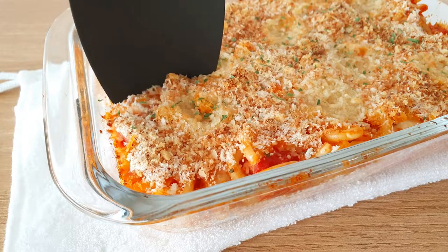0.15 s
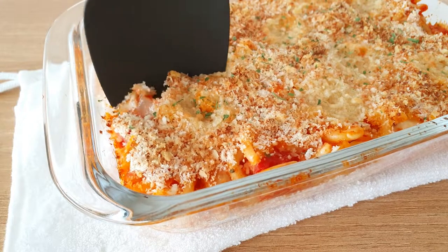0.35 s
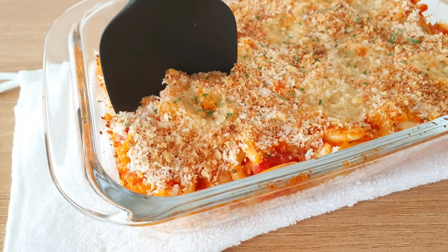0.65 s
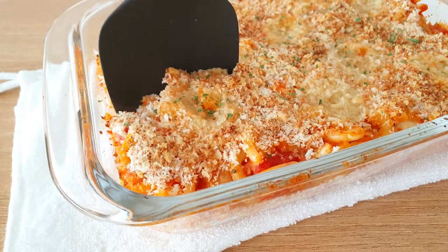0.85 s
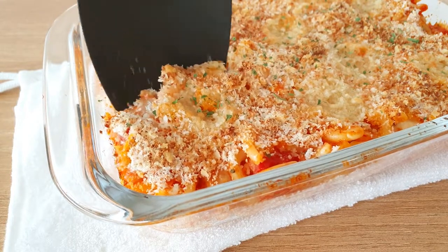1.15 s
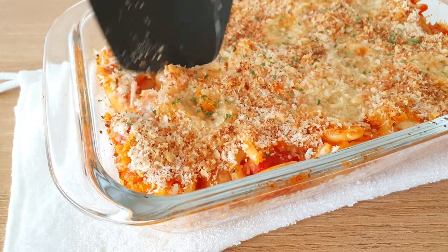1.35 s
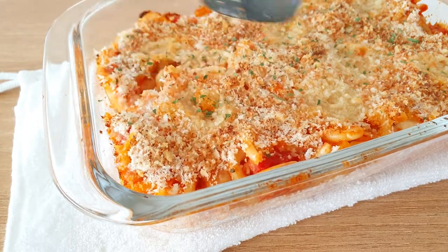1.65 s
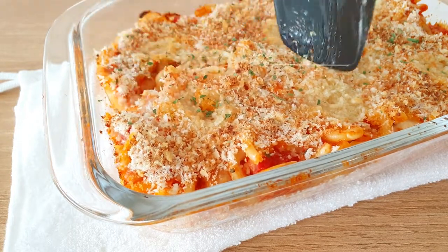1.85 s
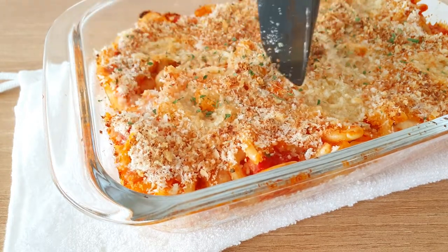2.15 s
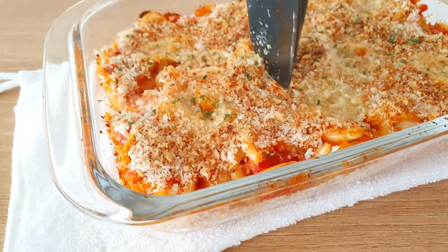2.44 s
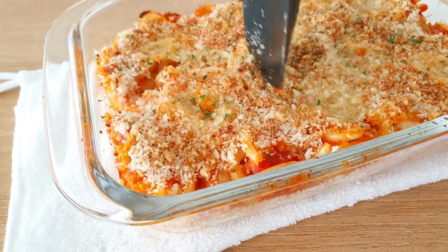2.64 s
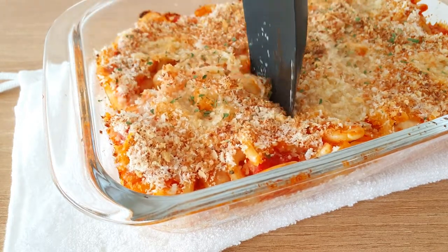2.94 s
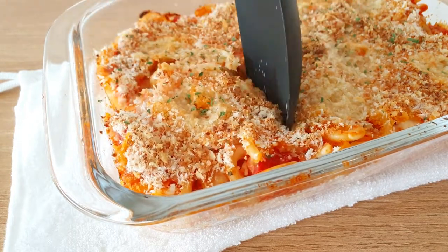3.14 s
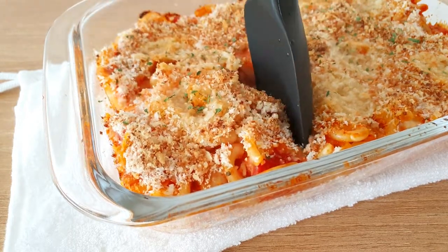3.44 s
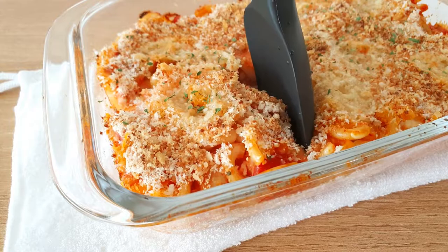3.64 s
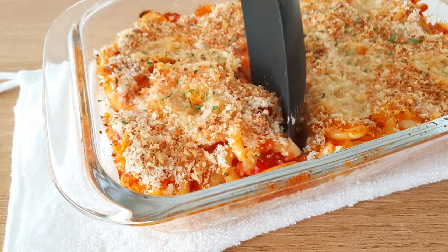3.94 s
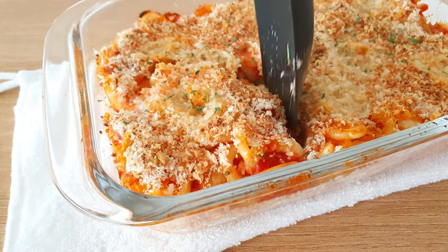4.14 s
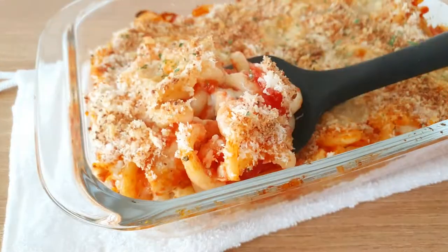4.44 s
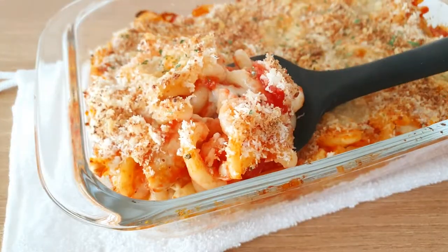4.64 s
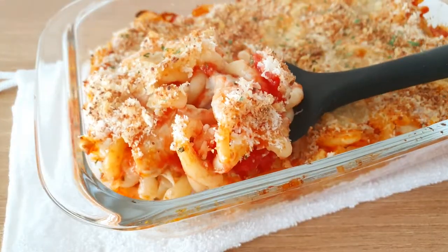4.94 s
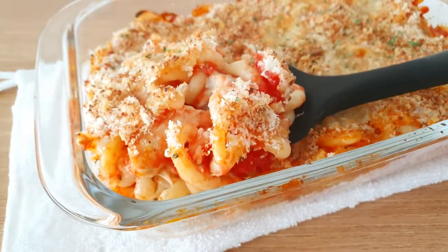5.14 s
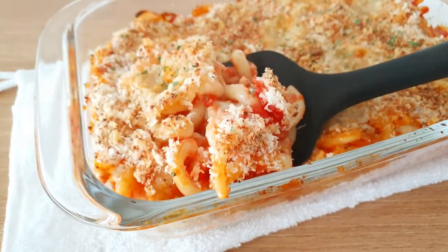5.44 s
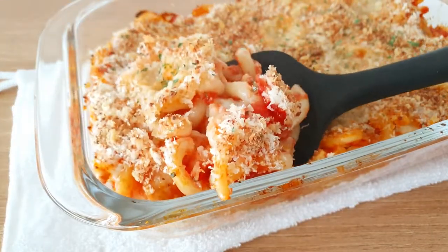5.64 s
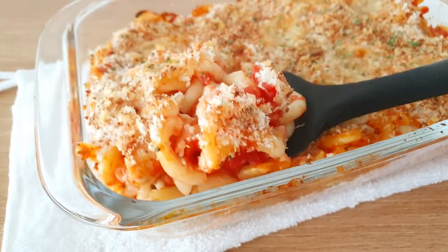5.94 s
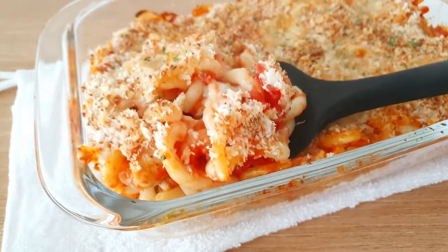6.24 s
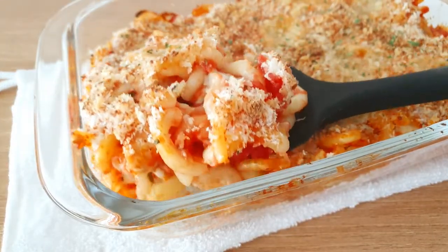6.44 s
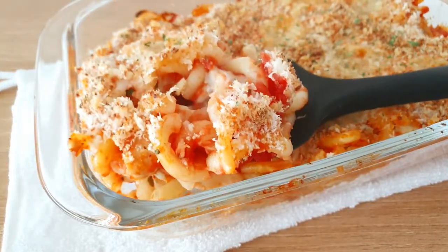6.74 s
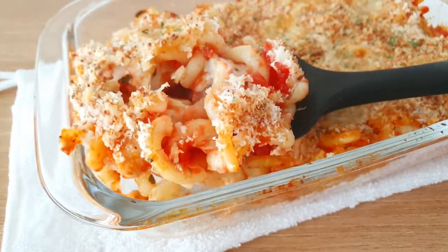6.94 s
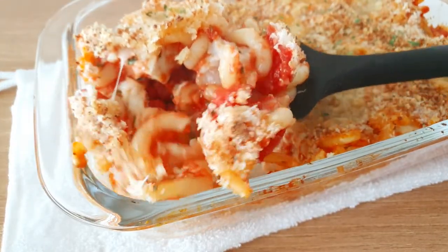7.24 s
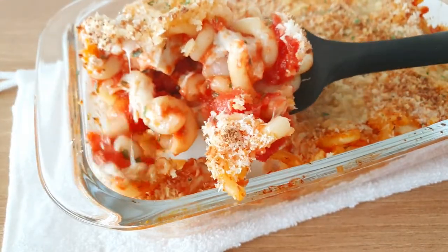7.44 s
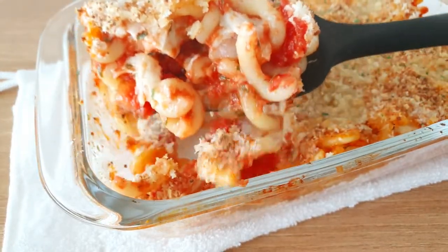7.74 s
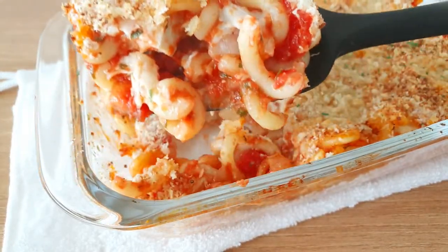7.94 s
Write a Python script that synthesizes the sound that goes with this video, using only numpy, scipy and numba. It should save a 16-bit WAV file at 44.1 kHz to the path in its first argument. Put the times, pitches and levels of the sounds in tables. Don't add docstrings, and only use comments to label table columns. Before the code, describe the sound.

Crisp crumbs break in dense clusters while larger flakes crack singly. The first cut fades into light ticking, the second is the strongest, with the blade juddering on glass and soft low thumps through the table. A momentary silence with one tick leads to lighter crackling, a sudden sticky tear, and a loosening scoop. Close microphone, dry quiet kitchen, low steady room hum.

```python
import sys
import numpy as np
from scipy import signal
from scipy.fft import rfft, irfft
from scipy.io import wavfile
from scipy.ndimage import uniform_filter1d
from numba import njit

SR = 44100
rng = np.random.default_rng(int(sys.argv[2]) if len(sys.argv) > 2 else 0)


def volts_from_db(level):
    exponent = np.asarray(level, float) / 20
    return 10 ** exponent


def unload_wav(signal):
    wavfile.write(
        sys.argv[1],
        SR,
        np.round(np.clip(np.atleast_2d(signal).T, -1, 1) * 32767).astype(np.int16),
    )


N = 356328

CUT_END_S, TICK_S, LIFT_START_S = 4.1675, 4.2392, 4.2603
RESTING_DB = -53
BAND_EDGES_HZ, FLAKE_HZ = (300, 850, 1650, 2700, 7200), 4500

# start [t/s], rise [t/s], hold [t/s], fall [t/s], crumbs at full pressure [level/dB]
STROKES = [(-0.3, 0.54, .3, .2, -41), (0.01, 0.36, 0.13, 0.22, -36.5), (1.089, 0.063, 0.081, 0.037, -47),
           (1.903, .7, .45, .1, -48.5), (2.76, 0.17, 0.069, .1, -41), (3.6, .05, 0.15, .1, -42.5),
           (2.897, 0.28, 0.14, 0.33, -32), (3.318, 0.12, 0.076, 0.32, -34.5),
           (3.835, 0.081, 0.1, 0.14, -36), (3.898, 0.11, .15, .1, -45), (4.206, 0.11, 0.99, 0.097, -43.5),
           (5.304, 0.069, 0.084, .2, -35.5), (5.306, 0.12, 0.97, 0.93, -37.5),
           (6.587, 0.34, 0.19, 0.23, -43), (7.237, 0.099, 0.11, 0.4, -46.5),
           (7.548, 0.034, 0.15, 0.76, -43)]
# [f/Hz], [level/dB per Hz]
CUTTING_COLOUR = [(190, -12), (330, -10.5), (441, -11), (501, -5.5), (552, -9.5), (637, -6), (1020, -9.5),
                  (2500, -5), (3480, 3), (4450, -8), (5600, -2), (6300, -5.5), (7200, -19.5), (9300, -14.5),
                  (15300, -32.5)]
# [f/Hz], [level/dB per Hz]
LIFTING_COLOUR = [(180, -53), (300, -44.5), (599, -23), (1260, -15), (1580, -19), (1890, -7), (2950, -0.5),
                  (3780, 4.5), (4450, -7.5), (6090, 0.5), (7540, -19), (9500, -13.5), (14600, -27.5),
                  (15300, -25.5)]
# [f/Hz], [level/dB per Hz]
RESTING_COLOUR = [(410, -20), (700, -12), (872, -16), (954, -11.5), (1820, -7), (2860, -5), (3470, 10.5),
                  (4320, -7), (5810, 4.5), (6870, -11), (8230, -3.5), (15300, -17.5)]
# [t/s], [level/dB]
SAUCE = [
    (4.26, -59),
    (5.38, -69),
    (5.48, -46),
    (6.44, -51.5),
    (6.7, -61),
    (7.0, -52),
    (7.36, -53),
    (7.5, -62.5),
    (7.62, -50),
    (8.08, -58),
]
# start [t/s], length [t/s], coarse flakes [level/dB]
SLIDES = [
    (.78, 0.15, -55),
    (1.09, 0.16, -39.5),
    (3.68, 0.081, -58),
]
# start [t/s], length [t/s], [level/dB]
FIZZES = [
    (-.05, 0.59, -49),
    (5.6, 0.15, -53),
    (1.11, 0.1, -63),
    (3.19, .07, -32.5),
    (3.62, 0.11, -46),
    (6.95, 0.15, -51),
    (7.32, 0.057, -43),
]
# [level/dB, twice the usual]
SHIFTS = [
    (7.56, .47, -88),
    (3.7, 0.14, -104),
]
# start [t/s], length [t/s], [level/dB]
LOW_SWELLS = [
    (7.26, 1.1, -60),
    (3.68, 0.078, -69),
    (3.6, 0.074, -58),
    (2.8, 0.084, -58),
    (2.42, 0.34, -65),
    (0.52, 0.46, -66),
]

# [t/s], peak [level/dB], ring [f/Hz], bright part [level/dB]
FIRST_CUT_CRACKS = [(0.0262, -25.5, 6030, -1.5), (0.0786, -23, 5300, -4), (0.1156, -21, 3510, -6),
                    (0.1554, -18, 3400, -9), (0.1651, -29, 2560, 9), (0.2065, -12.5, 3550, -18),
                    (0.2356, -15, 5850, -14), (0.2614, -15, 5540, -12), (0.2694, -19, 5740, -17),
                    (0.2981, -18, 5400, -4), (0.3195, -23, 3050, -19), (0.3326, -10, 5850, -11),
                    (0.3522, -10, 5700, -19), (0.3774, -13.5, 6200, 0.5), (0.3853, -16, 3600, -23),
                    (0.4396, -11, 3420, -17), (0.4447, -15, 3630, -16), (0.4551, -14, 3530, -20),
                    (0.4805, -9, 3550, -17), (0.4833, -7, 3500, -15), (0.4849, -14, 3400, -20),
                    (0.4881, -19, 3320, -18), (0.5012, -7, 3400, -26), (0.5258, -14, 3270, -28),
                    (0.5481, -19, 3170, -16.5), (0.5517, -10, 3570, -31), (0.5691, -14, 1870, -15),
                    (0.5754, -8, 3460, -31), (0.6128, -8.5, 3800, -22), (0.6182, -20, 3187, -30),
                    (0.6463, -20.5, 11000, -11), (0.6506, -33, 3380, -23), (0.662, -6, 3317, -37),
                    (0.7041, -29, 2370, -3), (0.713, -23, 3430, -15), (0.7248, -24, 3360, -26),
                    (0.7723, -17.5, 3400, -25), (0.7812, -26, 5860, -26), (0.8127, -20, 3180, -29),
                    (0.9586, -39, 6700, 10), (0.9757, -31, 3600, -6), (1.041, -22, 3140, -29),
                    (1.1543, -19.5, 6240, -6), (1.2073, -10.5, 3500, -5), (1.2471, -18, 3530, -4)]
# [t/s], peak [level/dB], ring [f/Hz], bright
# part [level/dB]
RESTING_TO_CUT_CRACKS = [(1.5152, -23, 5800, -13), (1.6392, -29.5, 3290, -1), (1.7839, -23, 3830, -10),
                         (1.8518, -27.5, 3650, -2), (1.919, -25, 3450, -2), (2.1009, -31, 6000, 3.5),
                         (2.138, -25, 5500, -9), (2.2535, -31.5, 7180, 6.5), (2.43, -33, 6030, 0),
                         (2.5328, -20.5, 3700, -8), (2.556, -21.5, 8040, -20), (2.679, -19, 5650, -17),
                         (2.7462, -29, 3490, -20), (2.7702, -14.5, 9500, -8), (2.7745, -28, 5900, 3),
                         (2.7782, -21, 8850, -7), (2.845, -21, 3490, -15), (2.8534, -15.5, 6460, -8),
                         (2.9258, -14.5, 8200, -4), (2.9485, -19, 5730, -1), (2.9597, -26, 1700, -15),
                         (2.9798, -16.5, 3530, -10), (2.9964, -17, 5700, -5), (3.0163, -20, 3380, -18),
                         (3.0356, -18.5, 3490, -22.5), (3.0558, -25, 6100, 1), (3.064, -28, 3290, -18),
                         (3.0886, -21, 2980, -14)]
# [t/s], peak [level/dB], ring [f/Hz], bright part [level/dB]
SECOND_CUT_CRACKS = [(3.0955, -8, 5570, -5), (3.128, -12, 5190, -32), (3.142, -8.5, 3010, -21),
                     (3.1847, -4.5, 1700, -26), (3.1962, -11, 3810, -7), (3.208, -12.5, 6030, -1),
                     (3.223, -14, 5280, -19), (3.227, -15, 5800, -5), (3.2412, -10, 5120, -18),
                     (3.2573, -8, 5830, -10), (3.2659, -9, 4950, -15), (3.2914, -15, 5380, -17),
                     (3.308, -13, 3450, -15), (3.3338, -3.5, 3720, -17), (3.3439, -3.5, 3300, -25),
                     (3.3688, -6, 3230, -26), (3.395, 1, 4830, -26), (3.4004, -4, 3420, -31),
                     (3.408, -10, 5750, -24), (3.4123, -3, 3430, -20), (3.4335, -3.5, 3430, -22.5),
                     (3.4707, -7.5, 3190, -22), (3.5128, -3, 3540, -13), (3.5211, -9.5, 2140, -19),
                     (3.5394, -13.5, 2110, -31), (3.547, -13, 3430, -28), (3.5848, -12.5, 3500, -18),
                     (3.591, -22, 2350, -15), (3.5956, -3, 3400, -29), (3.625, -23, 2610, -2),
                     (3.6406, -10.5, 6860, -10.5), (3.673, -8, 5720, -18), (3.702, -17, 2690, -4.5),
                     (3.765, -18, 3430, -8.5), (3.882, -12, 6000, -10.5), (3.8989, -20, 2240, -23.5),
                     (3.9117, -15, 2500, -18), (3.916, -7.5, 4130, -22), (3.9379, -20, 5920, 0),
                     (3.9471, -9, 3640, -8), (3.9564, -13.5, 1810, -9.5), (3.966, -19.5, 4870, 4),
                     (4.0039, -9.5, 6100, -11), (4.0068, -13, 3710, -4), (4.0346, -23, 4240, 7),
                     (4.0518, -14, 2290, -10), (4.133, -19, 5840, -3.5), (4.1567, -30, 6370, 6.5)]
# [t/s], peak [level/dB], ring [f/Hz], bright part [level/dB]
WEDGING_CRACKS = [(4.274, -13, 6120, -7), (4.3148, -20.5, 5940, -6), (4.3203, -20, 6140, -14),
                  (4.338, -27, 3510, -13), (4.3409, -15.5, 6310, -10), (4.3448, -20.5, 3060, -12),
                  (4.4008, -13, 3600, -25), (4.437, -25, 6330, 2), (4.4828, -21.5, 6240, -1),
                  (4.524, -18.5, 2440, -17), (4.533, -20.5, 3600, 1.5), (4.5661, -8.5, 5520, -12),
                  (4.5762, -16, 3600, -14), (4.6053, -22, 3680, 1), (4.6397, -19, 6240, -3),
                  (4.688, -17.5, 6180, -3), (4.8089, -22, 3550, -5), (4.8374, -13, 6010, -7),
                  (4.8862, -15, 6000, -6), (4.9508, -31.5, 5500, 10.5), (5.0349, -9, 5700, -20),
                  (5.078, -13.5, 5900, -11), (5.113, -18.5, 6300, -4), (5.1836, -23, 5760, -13),
                  (5.1904, -16.5, 5270, -19), (5.244, -19, 5880, -13), (5.2733, -13.5, 5520, -10),
                  (5.3255, -13, 5620, -19), (5.3514, -18, 5560, -15), (5.3558, -13, 5530, -20),
                  (5.358, -17, 5570, -14), (5.378, -11, 5150, -6), (5.3877, -14.5, 5840, -12)]
# [t/s], peak [level/dB], ring [f/Hz], bright part [level/dB]
TEARING_CRACKS = [(5.4207, -15.5, 2580, -14), (5.4346, -21, 6010, -2), (5.443, -12, 5700, -7),
                  (5.4458, -15, 3770, 2), (5.4494, -6.5, 6330, -3.5), (5.452, -2.5, 3800, -14),
                  (5.4703, -5.5, 3440, -14), (5.494, -13, 3600, -6), (5.498, -12.5, 6290, -3),
                  (5.518, -19, 2600, -9), (5.5758, -11, 3770, -23), (5.5912, -10, 6090, -18),
                  (5.613, -16, 6340, -1), (5.6428, -16, 5510, -14), (5.6593, -8.5, 6310, -4),
                  (5.6925, -13, 6440, -3), (5.7086, -11, 3100, -16), (5.7456, -10, 3730, -30),
                  (5.8116, -22, 6180, -23), (5.8344, -1.5, 6510, -19), (5.857, -13.5, 6630, -20),
                  (5.87, -18, 6370, 1), (5.912, -22.5, 3370, 5), (5.9244, -5, 3500, -17),
                  (5.928, -15, 3570, -16), (6.0041, -17, 3730, -9), (6.0083, -19, 6200, -8),
                  (6.027, -10, 3800, -19), (6.0354, -7.5, 5300, -23), (6.048, -13.5, 3730, -11),
                  (6.091, -10, 6170, -5), (6.1377, -20, 3200, -16), (6.1555, -6, 3700, -5),
                  (6.162, -19, 5970, -6), (6.188, -12, 6560, -6), (6.206, -24, 6240, 4),
                  (6.249, -22, 3790, 0), (6.2901, -14, 3620, -2), (6.2998, -6.5, 5530, -23),
                  (6.327, -17.5, 6220, -2), (6.3449, -3, 3670, -11)]
# [t/s], peak [level/dB], ring [f/Hz], bright part [level/dB]
LIFTING_CRACKS = [(6.359, -22, 3340, -1), (6.373, -27.5, 3510, 7), (6.4224, -26, 6180, 5),
                  (6.4372, -23.5, 3680, -16), (6.4736, -16.5, 3580, -13), (6.514, -20, 5300, 3),
                  (6.5533, -18.5, 5320, -9), (6.5732, -23, 3800, 6), (6.5756, -23, 6020, -17),
                  (6.6335, -20, 3350, -16), (6.6711, -13, 5700, -10), (6.735, -18, 5780, -5),
                  (6.74, -20, 5800, -9), (6.7481, -26, 3230, 2), (6.8116, -21.5, 3770, -11),
                  (6.8695, -20, 3510, -3), (6.874, -21, 5570, -10), (6.8885, -21, 5920, -13),
                  (6.9034, -20, 5730, -10), (6.9098, -13, 3320, -20), (6.9645, -5.5, 5750, -24),
                  (7.1088, -27, 6380, -13), (7.129, -12, 3780, -31), (7.3554, -28, 5900, -1),
                  (7.4647, -16.5, 5300, -13), (7.644, -16, 6100, -9), (7.6809, -17, 2850, -25),
                  (7.71, -15.5, 2800, -26), (7.749, -19, 3040, -10), (7.7568, -17, 3300, 3),
                  (7.8029, -10.5, 3240, -11), (7.8642, -16, 3330, -7), (7.897, -18, 2980, -25),
                  (7.992, -22, 6000, 2), (8.0405, -20, 5700, -13)]

# [t/s], peak [level/dB], ring [f/Hz]
POPS = [(0.502, -9, 2380), (2.979, -23, 1620), (3.143, -16.5, 1600), (3.1875, -5.5, 1570),
        (3.399, -22, 1650), (3.5105, -16, 1710), (3.5942, -12, 2030), (3.898, -21.5, 1830),
        (3.957, -10, 1740), (4.371, -33, 1410), (4.5217, -26, 1800), (4.6035, -26, 1230),
        (4.874, -34, 1280), (5.4503, -24.5, 1040), (5.5462, -20.5, 1380), (5.7447, -19.5, 1350),
        (5.8796, -21.5, 1270), (5.923, -25, 1220), (6.0516, -20, 1230), (6.4147, -30, 1250),
        (6.5346, -33, 1260), (6.9633, -28, 1230), (7.1292, -26, 1430)]
# [f/Hz], width [f/Hz], [level/dB]
DISH_MODES = [(227, 23, -7.5), (355, 17, 1), (506, 14, 7.5), (580, 7.6, 4), (630, 20, 4), (677, 16, -4)]
# [t/s], peak [level/dB], width [t/s]
THUMPS = [(0.55, -45.5, 0.051), (1.24, -52, 0.035), (2.5, -62, .04), (2.86, -59, 0.056), (3.75, -62, 0.15),
          (3.31, -58, 0.084), (3.49, -55, 0.11), (4.01, -47, 0.06), (6.9, -60, 0.094), (7.46, -60, 0.044),
          (8.08, -56, 0.066)]
# [f/Hz], [level/dB per Hz]
ROOM_COLOUR = [(15, -57), (25, -18), (40, 4.5), (60, 0), (297, 1), (557, -2), (900, -48), (1170, -60),
               (1980, -120)]
# [f/Hz], side minus mid [level/dB]
SPREAD = [(60, -29), (110, -35.5), (200, -27), (380, -15.5), (700, -16), (1290, -40), (2380, -29),
          (4400, -35), (8120, -19), (15000, -1.5)]


def unit(x):
    return x / np.sqrt(np.mean(x ** 2))


def colour(x, points):
    hz, db = np.transpose(points)
    size = 4096
    bin_hz = np.arange(size // 2 + 1) * SR / size
    log_gain = np.log(volts_from_db(np.interp(np.log(bin_hz + 1), np.log(hz), db)))
    cepstrum = irfft(log_gain)
    cepstrum[1:size // 2] *= 2
    cepstrum[size // 2 + 1:] = 0
    response = irfft(np.exp(rfft(cepstrum)))[:size // 2]
    return signal.fftconvolve(np.atleast_2d(x), response[None], axes=1)[..., :np.shape(x)[-1]]


def band(x, lo_hz, hi_hz):
    return signal.sosfilt(signal.butter(4, [lo_hz, hi_hz], "bandpass", fs=SR, output="sos"), x)


def walk(rate):
    smooth = int(SR / rate)
    hold = smooth // 8 + 1
    steps = np.repeat(rng.standard_normal(N // hold + 1), hold)[:N]
    return unit(uniform_filter1d(steps, smooth))


def pressure():
    t = np.arange(N) / SR
    levels = []
    for start, rise, hold, fall, db in STROKES:
        corners = start + np.cumsum([0, rise, hold, fall])
        levels.append(np.interp(t, corners, [RESTING_DB, db, db, RESTING_DB]))
    return np.max(levels, axis=0)


@njit
def grains(start, hz, cycles, size, n):
    out = np.zeros(n + 4096)
    for k in range(len(start)):
        fade = hz[k] / (SR * cycles[k])
        turn = np.exp(1j * (2 * np.pi * hz[k] / SR) - fade)
        z, not_risen, rise_step = size[k] + 0j, 1., np.exp(-3 * fade)
        for i in range(min(4000, int(6 / fade))):
            out[start[k] + i] += z.imag * (1 - not_risen)
            z *= turn
            not_risen *= rise_step
    return out[:n]


def crumbs(pressure_db, rate, cycles, cluster_db, tail_db, tail_s):
    chance = rng.random((60000, 5)).T
    start = np.cumsum(-np.log(chance[0]) * SR / rate).astype(np.int64)
    start, chance = start[start < N], chance[:, start < N]
    scatter_db = np.interp(pressure_db[start], [-50, -32], [3.6, 7.])
    hz = 400 + 16000 * chance[1] ** 1.428
    size = volts_from_db(-scatter_db * np.log(np.maximum(chance[2], .08)))
    size = size * (hz / 4000) ** 0.5 * np.sign(chance[3] - .5)
    snaps = grains(start, hz, cycles * (0.47 + 0.89 * chance[4] ** 2), size, N)
    depth_db = np.interp(pressure_db, [-50, -35], [1.2, cluster_db])
    snaps = snaps * volts_from_db(depth_db * (walk(170) + 0.2 * walk(30)))
    keep_share = np.exp(-1 / (tail_s * SR))
    rustle = np.sqrt(signal.lfilter([1 - keep_share], [1, -keep_share], snaps ** 2))
    rustle_gain = volts_from_db(np.interp(pressure_db, [-48, -36], tail_db))
    out = snaps + rustle_gain * rustle * rng.standard_normal(N)
    return out / np.sqrt(uniform_filter1d(out ** 2, size=SR // 6))


def by_shot(x, pressure_db):
    share = np.interp(pressure_db, [-47, -40], [0, 1])
    breaking = share * unit(colour(x, CUTTING_COLOUR)[0])
    resting = (1 - share) * unit(colour(x, RESTING_COLOUR)[0])
    lifting = unit(colour(x, LIFTING_COLOUR)[0])
    return np.where(np.arange(N) < TICK_S * SR, breaking + resting, lifting)


def swells(rows):
    t = np.arange(N) / SR
    total = np.zeros(N)
    for start, length, db in rows:
        total += volts_from_db(db) * np.sin(np.pi * np.clip((t - start) / length, 0, 1)) ** 2
    return total


def follow(crumb_db, cutting, lifting, lag_s=0):
    t = np.arange(N) / SR
    push_db = np.interp(t - lag_s, t, crumb_db) - RESTING_DB
    cutting_db = cutting[0] + cutting[1] * push_db
    lifting_db = lifting[0] + lifting[1] * push_db
    return volts_from_db(np.where(t < TICK_S, cutting_db, lifting_db))


def patchy():
    return volts_from_db(1.22 * walk(16))


def crumbling():
    t = np.arange(N) / SR
    crumb_db = pressure()
    snaps = crumbs(crumb_db, rate=2600., cycles=0.56, cluster_db=1.5, tail_db=(-5, -13), tail_s=0.025)
    crackle = by_shot(snaps, crumb_db)
    pocket_hz, pocket_width_hz = 1300, 220
    pocket = signal.lfilter(*signal.iirpeak(pocket_hz, pocket_hz / pocket_width_hz, SR), crackle)
    crackle = crackle + 2.42 * pocket * (t > TICK_S)
    dust = by_shot(rng.standard_normal(N), crumb_db)
    dusty = crackle + 0.59 * volts_from_db(2.9 * walk(25)) * dust

    body = follow(crumb_db, (-67, 0.38), (-63, 0.76)) + swells(LOW_SWELLS)
    sauce = volts_from_db(np.interp(t, *np.transpose(SAUCE), left=-120))
    wet = follow(crumb_db, (-67.5, 1), (-78.5, 0.39)) + sauce
    coarse = follow(crumb_db, (-56, 0.74), (-63, 0.95), lag_s=0.029) + swells(SLIDES)
    grit_gain = follow(crumb_db, (-56, 0.99), (-46.5, 0.55), lag_s=-0.014)
    medium = volts_from_db(crumb_db - 2.0)
    thin = volts_from_db(crumb_db - 1.5) + swells(FIZZES)

    a, b, c, d, e = BAND_EDGES_HZ
    out = grit_gain * unit(band(dusty, e, 14900))
    out = out + swells(SHIFTS) ** .5 * unit(band(np.roll(crackle, SR // 2), 2230, 3400))
    layers = [(a, b, body), (b, c, wet), (c, d, coarse), (d, FLAKE_HZ, medium), (FLAKE_HZ, e, thin)]
    for lo_hz, hi_hz, gain in layers:
        out = out + gain * patchy() * unit(band(crackle, lo_hz, hi_hz))
    return out


def cracks():
    out, t = np.zeros(N + SR), (np.arange(1024) - 256) / SR
    after = np.maximum(t, 0)
    build_up = 0.048 * np.exp(t / 0.00072)
    die_away = .15 * np.exp(-t / 0.00033) + .03 * np.exp(-t / 0.004)
    spray = np.where(t < 0, build_up, die_away)
    flakes = FIRST_CUT_CRACKS + RESTING_TO_CUT_CRACKS + SECOND_CUT_CRACKS
    flakes = flakes + WEDGING_CRACKS + TEARING_CRACKS + LIFTING_CRACKS
    thin_hz = BAND_EDGES_HZ[-1]
    for s, peak_db, hz, bright_db in flakes:
        snap = spray * rng.standard_normal(len(t)) - 0.64 * (t == 0)
        snap = colour(snap, CUTTING_COLOUR if s < TICK_S else LIFTING_COLOUR)[0]
        middle, bright = band(snap, 1200, thin_hz), band(snap, thin_hz, 14600)
        cycles = 0.62 + 0.75 * rng.random() + (hz > thin_hz)
        ring = np.sin(2 * np.pi * hz * after) * after * hz / cycles * np.exp(1 - after * hz / cycles)
        middle = middle / np.abs(middle).max() - ring * (3 if hz > thin_hz else 1)
        i = int(s * SR) - np.abs(middle).argmax() + 1024
        flake = middle / np.abs(middle).max() + volts_from_db(bright_db + 3.5) * bright / np.abs(bright).max()
        out[i:i + len(t)] += volts_from_db(peak_db - 2.5) * flake
    return band(out[1024:N + 1024], 290, 20000)


def pops():
    s, db, hz = np.transpose(POPS)
    start = ((s + 0.000917) * SR).astype(np.int64)
    return grains(start, hz, 1.38 + 0 * hz, volts_from_db(db + 5.5), N)


def dish_drag():
    t = np.arange(N) / SR
    catch_s, release_s, settle_s = 3.288, 3.53, 0.082
    catch_db, settled_db = -36.5, -48.5
    db = settled_db + (catch_db - settled_db) * np.exp(-((t - catch_s) / settle_s) ** 2)
    judder = rng.standard_normal(N) * volts_from_db(db + 2.9 * walk(90)) * (t > catch_s) * (t < release_s)
    hum = np.zeros(N)
    for hz, width_hz, mode_db in DISH_MODES:
        hum += volts_from_db(mode_db) * signal.lfilter(*signal.iirpeak(hz, hz / (1.35 * width_hz), SR), judder)
    return volts_from_db(26.0) * hum


def kitchen():
    t = np.arange(N) / SR
    low = colour(rng.standard_normal(N), ROOM_COLOUR)[0]
    table, room = unit(band(low, 24, 120)), unit(band(low, 110, 1100))
    pushes = sum(volts_from_db(db) * np.exp(-((t - s) / width_s) ** 2) for s, db, width_s in THUMPS)
    table_rest = volts_from_db(np.where(t < TICK_S, -68, -64))
    rumble = (table_rest + pushes) * volts_from_db(0.42 * walk(2.5)) * table
    hum = volts_from_db(np.where(t < TICK_S, -68.0 + 0.49 * (pressure() - RESTING_DB), -63.5)) * room
    hiss = volts_from_db(-62) * unit(band(rng.standard_normal(N), 11000, 15500))
    return rumble + hum + hiss


def scene():
    mid = crumbling() + cracks() + pops() + dish_drag() + kitchen()
    bass = signal.filtfilt(*signal.butter(2, 190, fs=SR), mid)
    side = colour(mid * walk(65), SPREAD)[0] * volts_from_db(-6.5) - 0.065 * bass
    return np.array([mid + side, mid - side])


def roll_off(x):
    return signal.sosfilt(signal.butter(12, 16500, fs=SR, output="sos"), x)


def record(dry):
    t = np.arange(N) / SR
    dry = signal.sosfilt(signal.ellip(8, .3, 40, 15350, fs=SR, output="sos"), dry)
    dry = np.tanh(dry * .7) / .7
    busy = np.interp(pressure(), [-50, -34], [-1.7, -.7])
    for lo_hz, hi_hz in (10000, 11500), (11500, 13300), (13300, 15800):
        top = signal.sosfiltfilt(signal.butter(4, [lo_hz, hi_hz], "bandpass", fs=SR, output="sos"), dry)
        gaps = uniform_filter1d(1. * (walk(170) < busy), size=SR // 500)
        dry = dry - .85 * top * gaps
    fade_out = np.clip((CUT_END_S - t) / 0.0022, 0, 1)
    fade_in = np.clip((t - LIFT_START_S) / 0.0036, 0, 1)
    tick = np.exp(-((t - TICK_S) / .00005) ** 2) * np.sin(2 * np.pi * 3400 * (t - TICK_S))
    mix = dry * (fade_out + fade_in) + volts_from_db(-27.0) * tick
    return roll_off(mix)


dry = scene()
out = record(dry)
unload_wav(out)
```